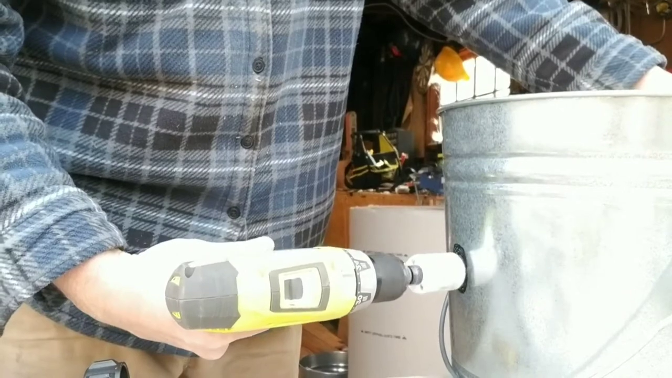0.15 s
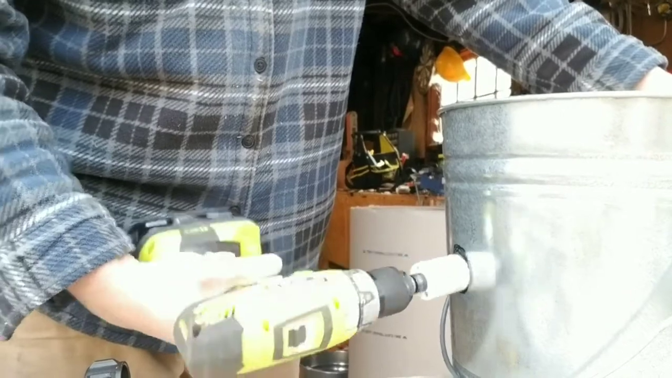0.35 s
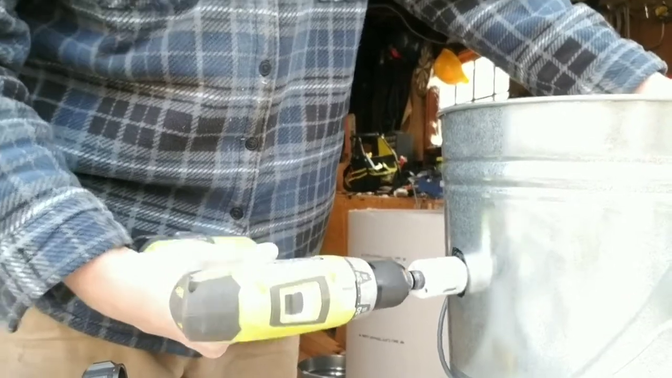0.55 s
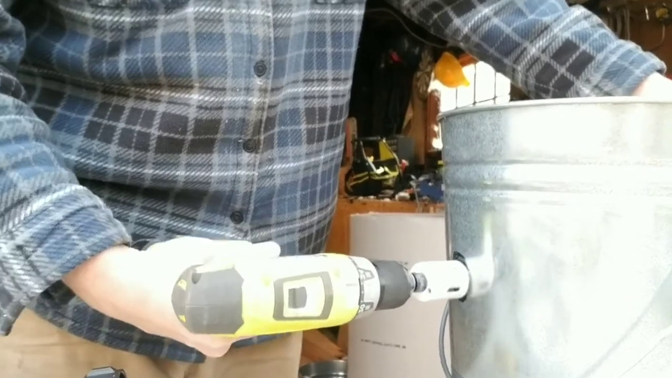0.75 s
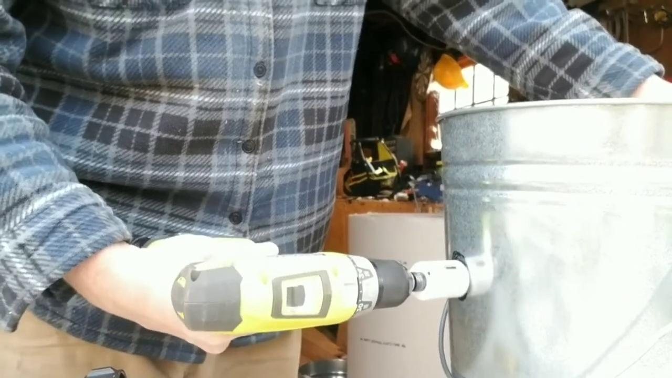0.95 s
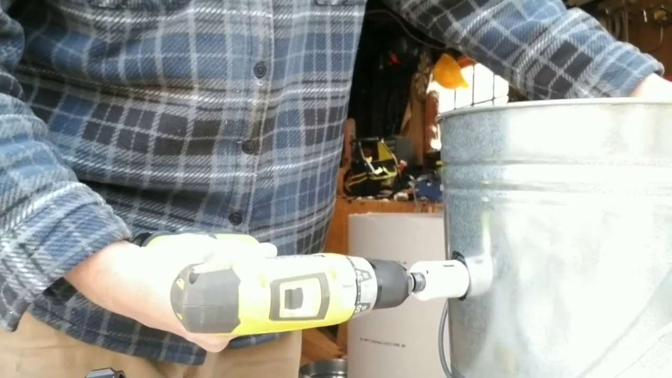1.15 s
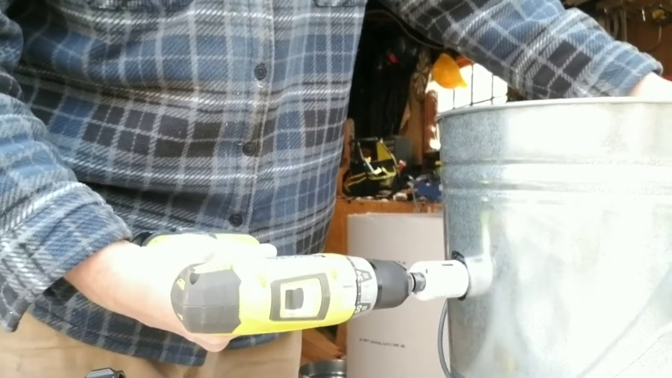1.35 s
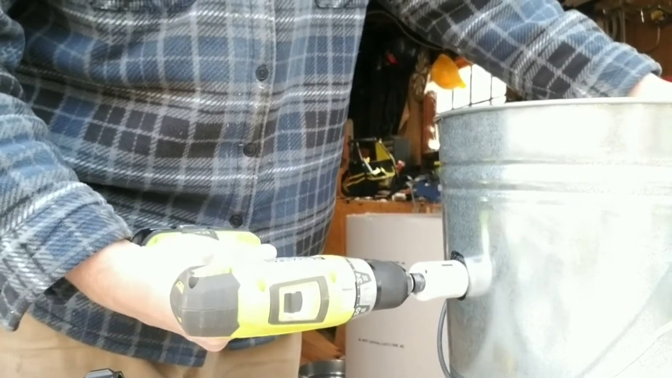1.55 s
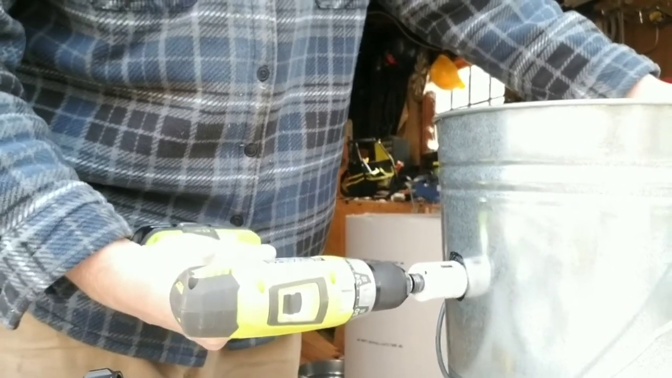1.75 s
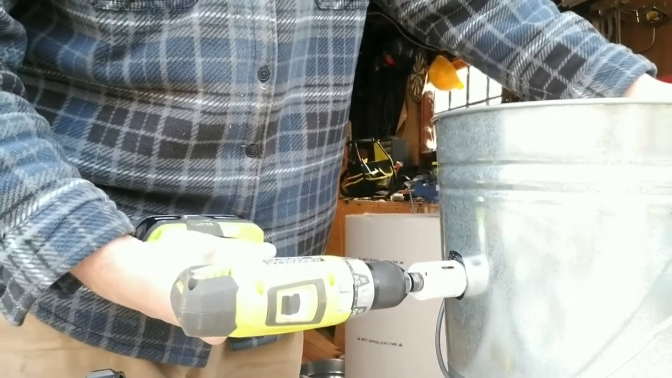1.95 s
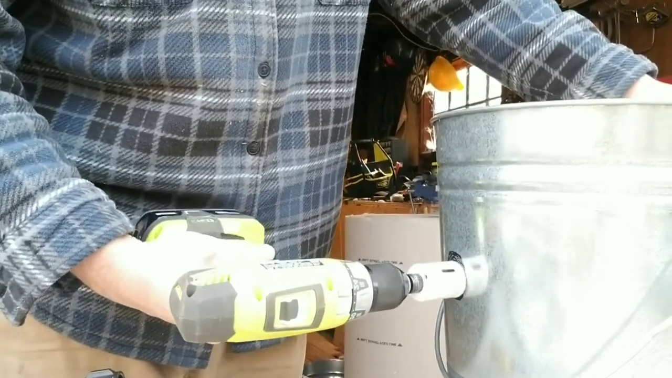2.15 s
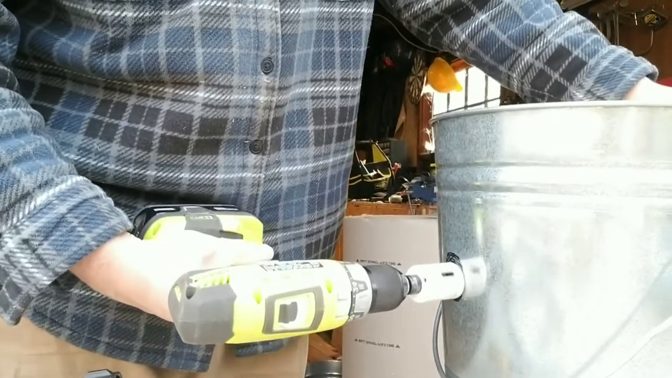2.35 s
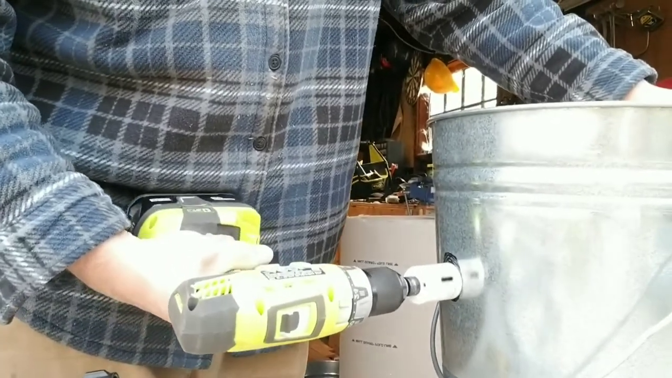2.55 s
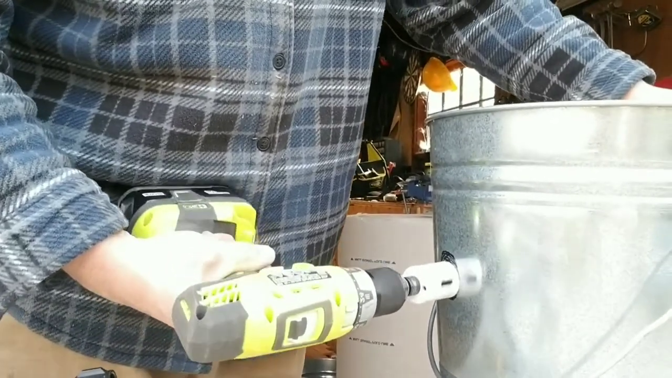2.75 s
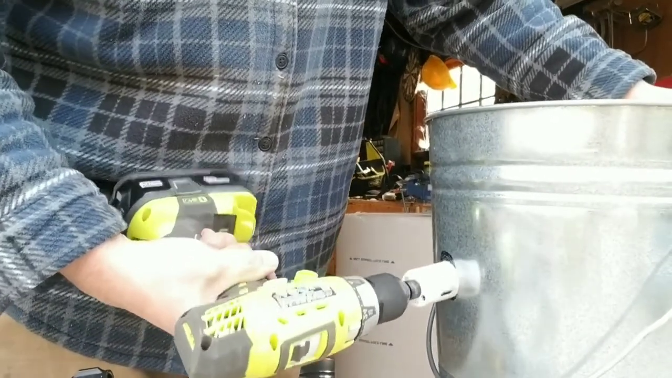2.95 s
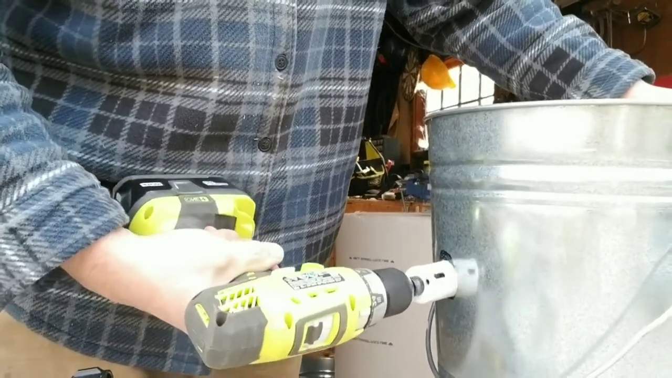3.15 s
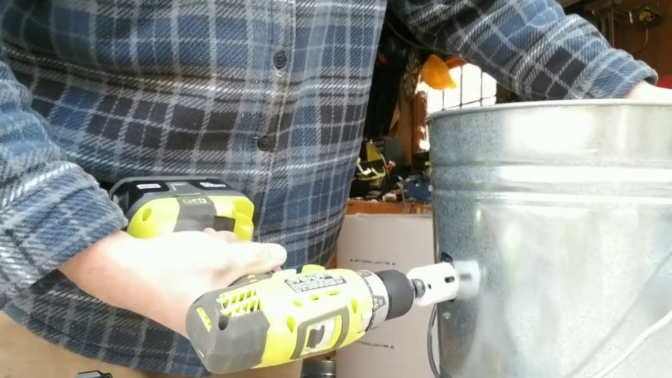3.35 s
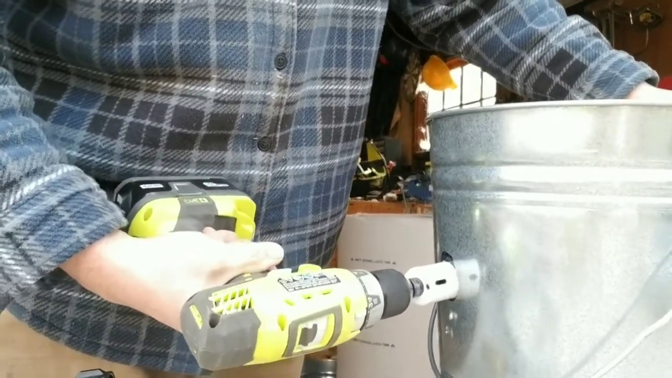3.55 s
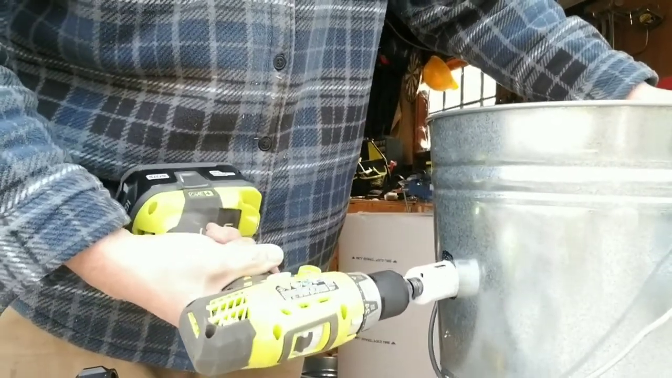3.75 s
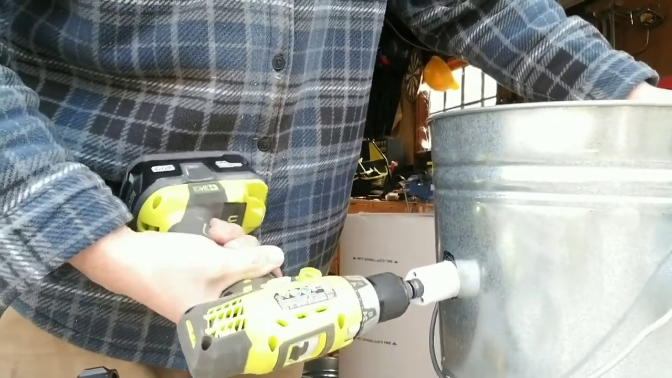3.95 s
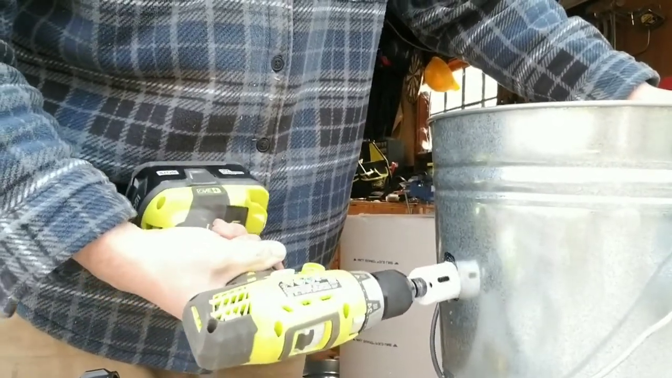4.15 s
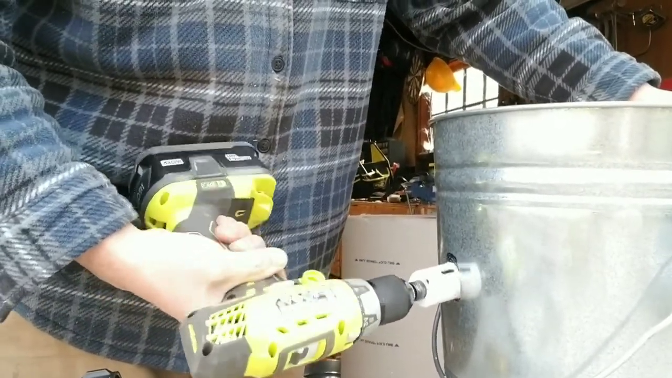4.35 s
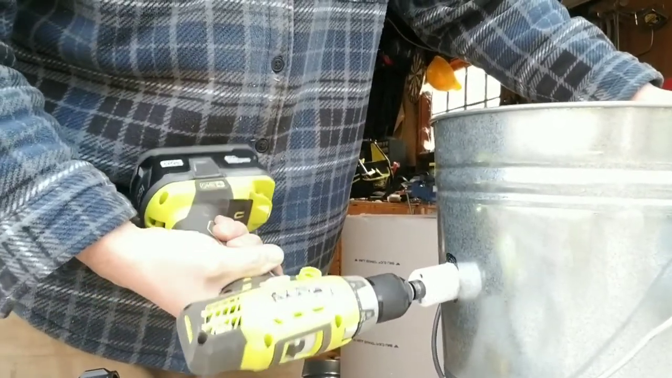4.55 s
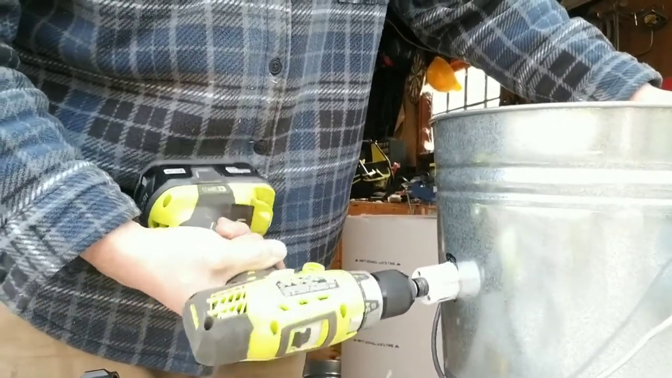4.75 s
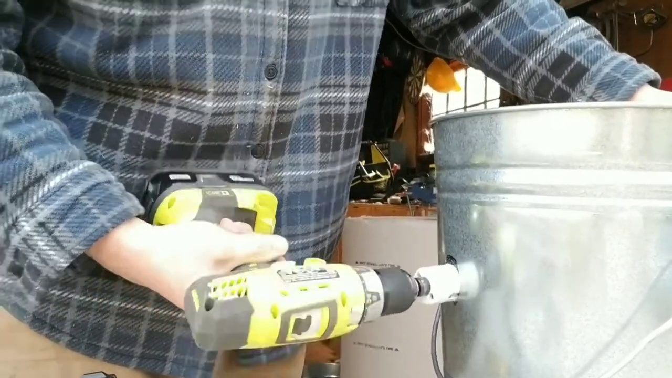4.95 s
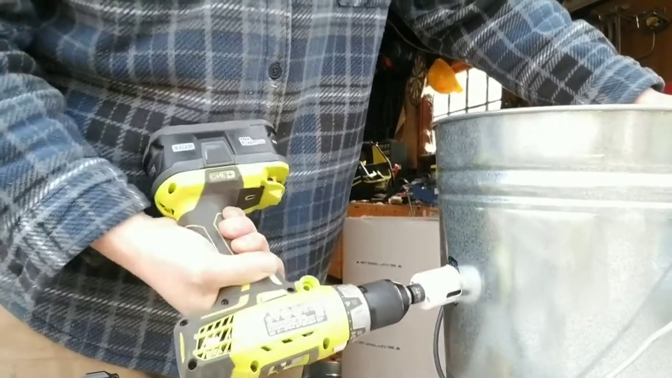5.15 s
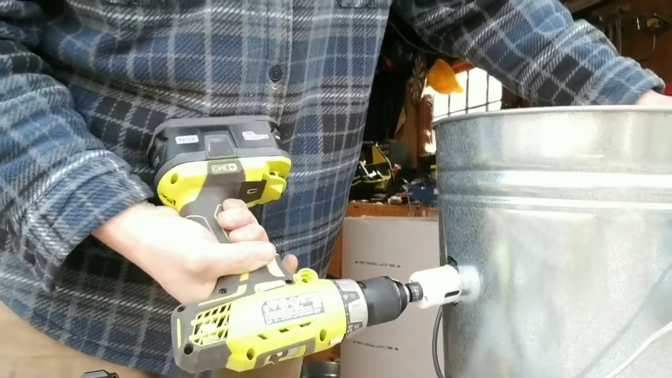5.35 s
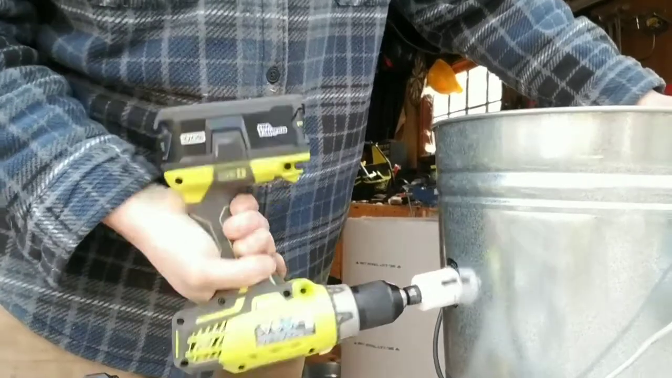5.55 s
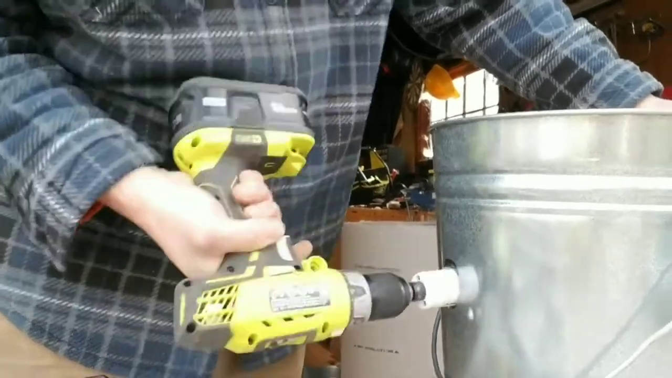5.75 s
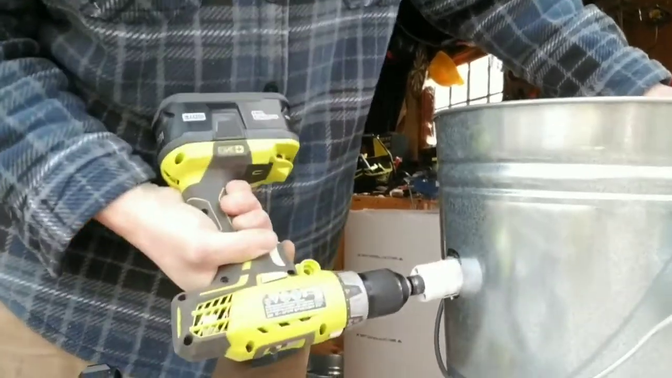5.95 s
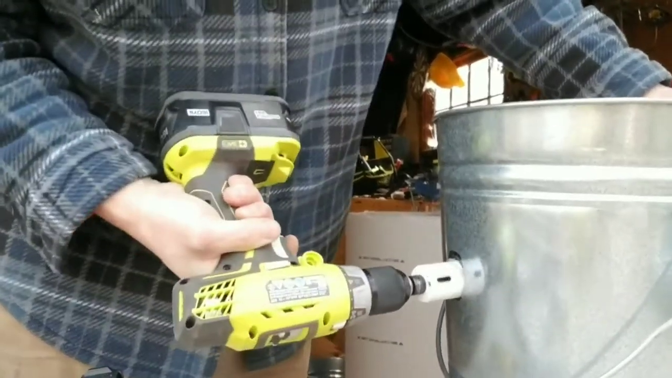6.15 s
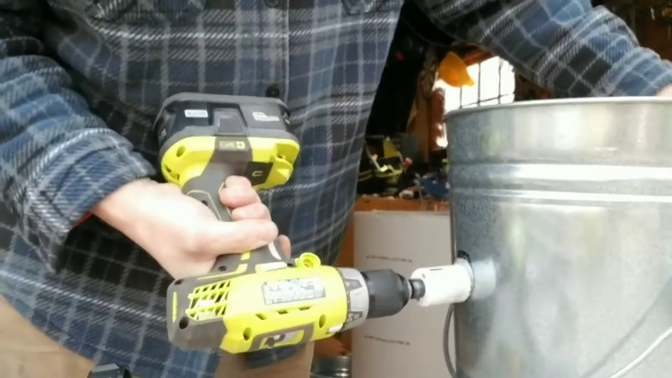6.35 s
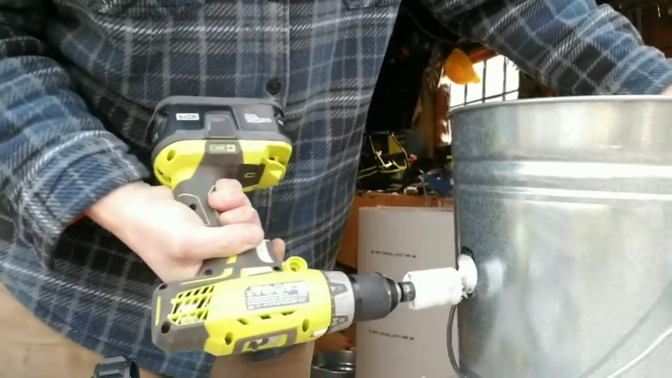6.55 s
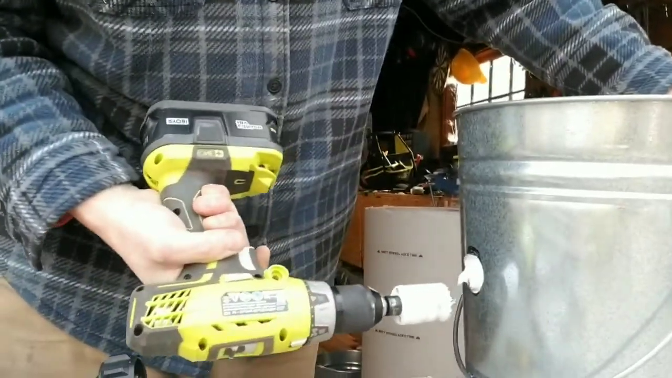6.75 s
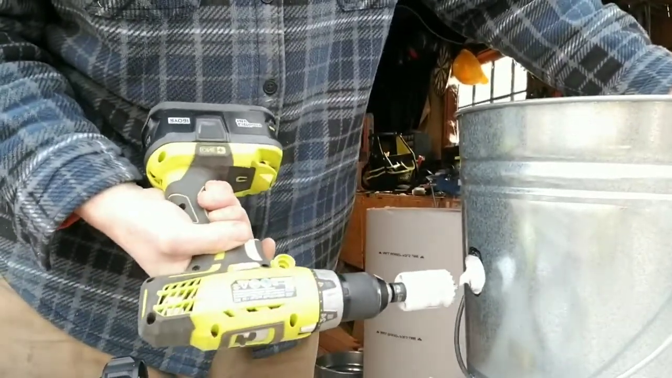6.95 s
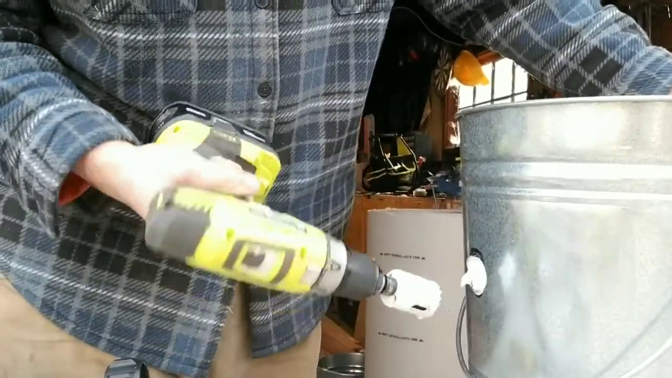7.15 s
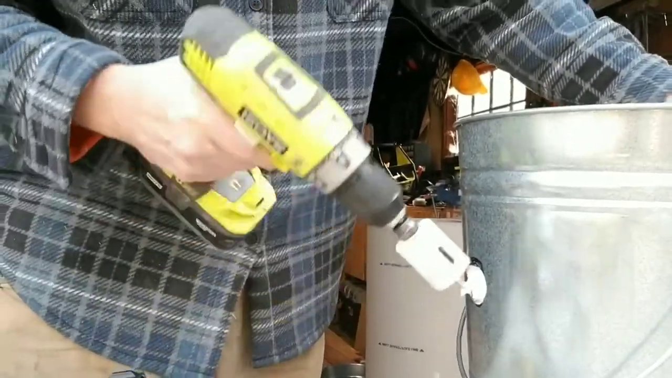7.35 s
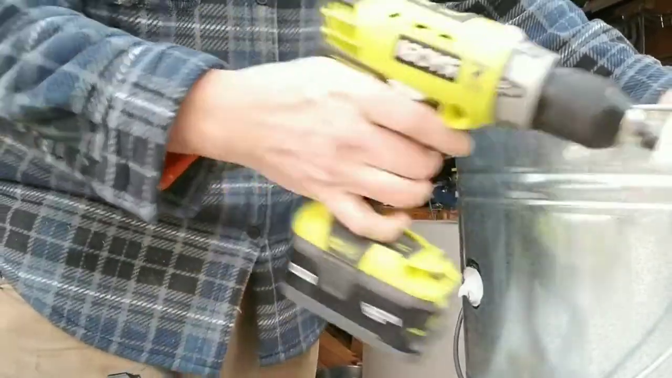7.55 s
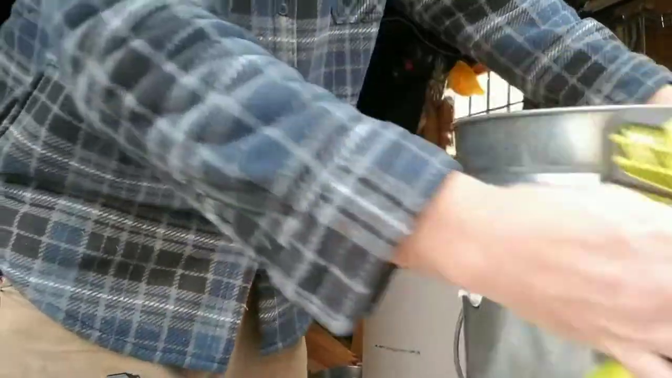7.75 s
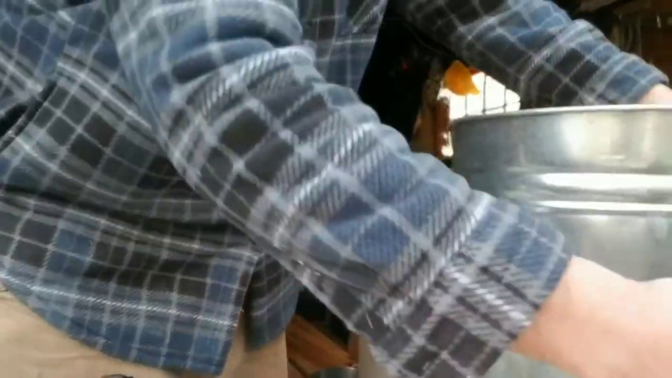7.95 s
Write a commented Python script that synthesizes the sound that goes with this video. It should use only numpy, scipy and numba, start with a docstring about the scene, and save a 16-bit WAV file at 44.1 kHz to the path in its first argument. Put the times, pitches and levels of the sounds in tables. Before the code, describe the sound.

From 0 s a slow hole saw is already grinding on a thin steel tub: a close, dry, gritty rasp with sizzling swarf, ticking chips, short squeals and a low wavering drone. Small snags jolt it around 0.25 and 0.4 s, then it scrapes fairly steadily. From about 2.7 s the teeth catch harder, with hollow booms, clangs and cracks; after a slightly thinner stretch around 3.4 s the banging becomes dense and violent from 3.9 to 4.9 s. It stops sharply at 5 s, with faint cloth rustle. A short, rough burst comes at 5.5-5.7 s, a knock at 5.9 s, then a weaker grind at 6.0-6.2 s, with a faint motor whine and rub coasting down to 6.5 s. Quiet low workshop rumble remains, with a light knock at 6.7 s and sleeve movement. A heavy dull thud lands near 7.85 s, followed immediately by a smaller bump.

```python
"""A cordless drill turns a hole saw slowly through the wall of a thin steel tub in a workshop.
One force on the teeth scrapes out the rasp and shakes the wall into chatter and drone; chips tick.
Gliding tones squeal from wall and cup, and the motor whines faintly as it coasts. As the cut opens, the teeth
snag and bang: each jolt is a burst of boom, clang and crack. Two short bursts finish the hole and a last grind
follows; cloth rustles as filtered noise, the drill is put down with a thud of ringing modes, and the shop rumbles."""
import sys
import numpy as np
from scipy import signal
from scipy.fft import rfft, irfft, next_fast_len
from scipy.io import wavfile
from scipy.ndimage import uniform_filter1d
from numba import njit

SR = 44100
rng = np.random.default_rng(int(sys.argv[2]) if len(sys.argv) > 2 else 0)


def int16_out(signal):
    """Quantize to a 16-bit WAV file."""
    q = np.round(np.clip(np.atleast_2d(signal).T, -1, 1) * 32767)
    wavfile.write(sys.argv[1], SR, q.astype(np.int16))


N = 353241
TIME = np.arange(N) / SR  # seconds

# Teeth that snag hard on the cut edge. Each row: time in seconds, then relative levels of
# boom, clang and crack in dB, and clang pitch in Hz.
SNAGS = [(.243, -24.5, -25.5, -34, 520), (0.25, -29, -22.5, -33.5, 520), (.394, -21, -28, -44, 430),
         (.403, -21, -27, -44, 430), (.428, -21, -26, -40, 430), (.438, -21, -26, -38, 432),
         (2.701, -12, -20, -40.5, 480), (2.789, -12.5, -18, -25, 520), (2.794, -26.5, -20, -33, 600),
         (2.817, -33.5, -31, -40, 745), (2.869, -29.5, -18, -36, 810), (2.898, -25, -15.5, -21.5, 450),
         (2.910, -17, -17, -27, 696), (2.927, -21, -13.5, -33, 620), (2.991, -15, -13.5, -32, 586),
         (3.010, -15.5, -14, -23, 500), (3.037, -18, -12, -24, 700), (3.045, -21.5, -24, -30, 696),
         (3.087, -34, -16.5, -40, 720), (3.128, -17, -19, -22.5, 746), (3.147, -17.5, -15.5, -25, 520),
         (3.176, -31, -20, -28, 700), (3.296, -23, -28, -39, 605), (3.605, -17, -26, -30, 500),
         (3.626, -21, -20, -37, 720), (3.739, -16, -22, -46, 650), (3.771, -28, -25, -44, 680),
         (3.784, -23, -25, -39, 951), (3.799, -16, -17, -31, 786), (3.852, -23, -18, -40, 720),
         (3.869, -29, -24.5, -39, 1100), (3.886, -14.5, -23, -42, 600), (3.925, -14.5, -22, -30.5, 520),
         (3.955, -11, -22, -22, 446), (3.981, -12, -22, -31, 520), (4.0268, -21, -13.5, -30, 690),
         (4.070, -19, -19.5, -41, 720), (4.102, -12.5, -29, -30, 420), (4.109, -11.5, -20, -26.5, 746),
         (4.124, -18, -27, -25, 1196), (4.163, -14, -22, -49, 600), (4.220, -20, -20, -28, 560),
         (4.240, -17, -12.5, -28, 453), (4.259, -16.5, -13, -25, 619), (4.267, -26, -20, -22, 599),
         (4.2772, -14.5, -15, -21.5, 682), (4.2992, -20, -11, -29, 840), (4.317, -16, -17, -25, 750),
         (4.338, -26, -17.5, -27, 650), (4.353, -18, -13.5, -34, 715), (4.376, -16, -17, -29, 479.5),
         (4.389, -12, -25, -26, 450), (4.397, -14, -21, -30, 510), (4.403, -14, -24, -31, 480),
         (4.418, -10, -17, -30, 480), (4.448, -27, -25, -40, 1140), (4.465, -12, -12, -40, 668),
         (4.486, -17.5, -25, -42, 601), (4.502, -22.5, -20.5, -36, 900), (4.516, -16.5, -18.5, -33.5, 650),
         (4.541, -29, -22, -34, 800), (4.556, -17.5, -19, -25, 555), (4.566, -11, -20, -22, 480.4),
         (4.594, -17.5, -19.5, -30, 600), (4.617, -15, -23, -42, 523), (4.634, -15, -20, -42, 480),
         (4.657, -13, -15, -38, 690), (4.675, -16, -24, -44, 450), (4.714, -19, -24, -32, 700),
         (4.731, -14, -20, -25.5, 650), (4.772, -14, -20, -34, 590), (4.791, -12, -28, -41, 521),
         (4.820, -12.5, -17.5, -30, 450), (4.841, -18, -24, -33, 800), (4.897, -29, -23, -30, 1300),
         (4.907, -20, -19, -36, 460), (4.9756, -18.5, -25, -40, 695), (5.502, -19, -18.5, -39, 650),
         (5.5135, -27, -21, -28, 1150), (5.5166, -19.5, -17, -18, 848), (5.573, -26, -30, -46, 623),
         (5.636, -19, -24, -33, 481), (5.6946, -20.5, -22, -47, 544), (6.172, -34, -34, -41, 650),
         (6.191, -34, -36, -50, 520), (6.213, -37, -37, -47, 596), (6.223, -33, -31, -42, 516),
         (6.2368, -24, -29, -50, 513)]
# Pulls of the trigger. Each row: up to speed in seconds, released in seconds,
# coasting rub starts to fade in seconds, relative shaking of the wall in dB.
PULLS = [(-.1, 4.988, 5.09, -0.5), (5.482, 5.678, 5.5, -6.5), (6, 6.137, 6.43, -3.5)]
BRAKE_DB_PER_S = 526  # how fast the cutting sound falls at release


def amp(db):
    """Decibels to gain."""
    return 10 ** (np.asarray(db) / 20)


def unit(x):
    """Scale to rms 1."""
    return x / np.sqrt(np.mean(x ** 2))


def walk(rate):
    """Smooth random wander of rms 1, with about rate new values a second."""
    hold = int(SR / rate)
    steps = np.repeat(rng.standard_normal(N // hold + 1), hold)
    return unit(uniform_filter1d(steps, hold)[:N])


def swells(rows):
    """Gain of smooth movements that rise and fall; rows of middle s, half length s, dB."""
    gain = np.zeros(N)
    for s, half, db in rows:
        near = slice(*np.searchsorted(TIME, [s - 4 * half, s + 4 * half]))
        gain[near] += amp(db) * np.exp(-((TIME[near] - s) / half) ** 2)
    return gain


def colour(x, points):
    """Causal minimum-phase filter with a spectrum of (Hz, dB) points."""
    size = next_fast_len(x.shape[-1] + 4096, True) // 2 * 2
    hz, db = np.transpose(points)
    octave = np.log2(np.maximum(np.fft.rfftfreq(size, 1 / SR), 1))
    outside = np.abs(octave - np.clip(octave, np.log2(hz[0]), np.log2(hz[-1])))
    # beyond the end points the level falls 20 dB an octave, by 40 dB at most
    level_db = np.interp(octave, np.log2(hz), db) - 20 * np.minimum(outside, 2)
    cepstrum = irfft(np.log(amp(level_db)))
    cepstrum[1:size // 2] *= 2
    cepstrum[size // 2 + 1:] = 0
    return irfft(rfft(x, size) * np.exp(rfft(cepstrum)))[..., :x.shape[-1]]


def resonate(x, hz, width):
    """One resonance, gain 1 at its centre."""
    return signal.lfilter(*signal.iirpeak(hz, hz / width, fs=SR), x)


@njit
def moving_resonance(x, hz, width):
    """A resonance whose centre moves, gain 1 at the centre."""
    y, band, low = np.empty(len(x)), 0., 0.
    for i in range(len(x)):
        g, k = np.tan(np.pi * hz[i] / SR), width / hz[i]
        v = (band + g * (x[i] - low)) / (1 + g * (g + k))
        band, low, y[i] = 2 * v - band, low + 2 * g * v, k * v
    return y


def shifting_modes(x, modes, wander_db, rate, bend=0):
    """Resonances whose shares and pitches shift as the point of contact travels round the cut."""
    out = 0
    for hz, width, db in modes:
        centre = hz * np.exp(bend * walk(rate))
        share = amp(db + wander_db * walk(rate))
        out = out + share * np.array([moving_resonance(port, centre, float(width)) for port in x])
    return out


def even_out(x, window_s):
    """Steady pressure on the drill holds a vibration at its mean strength."""
    power = uniform_filter1d(np.mean(x ** 2, axis=0), int(window_s * SR))
    return x / np.sqrt(power + 1e-12)


def ports(x, lag):
    """The two microphone ports; the right one hears lag samples later (the left one, if lag is negative)."""
    late = int(np.round(lag))
    return np.array([np.pad(x, (max(d, 0), 0))[:len(x)] for d in (-late, late)])


def scrape(force, spread_db):
    """Dense tiny slips of unequal size, as strong as the force on the teeth."""
    sizes = amp(spread_db * np.minimum(rng.exponential(size=N), 5))
    return unit(rng.standard_normal(N) * sizes * force)


def spread(force, spread_db, diffuse, lag):
    """Scraping heard directly and, unrelated at each port, off the tub and the shop."""
    direct = ports(scrape(force, spread_db), lag)
    return direct + diffuse * np.array([scrape(force, spread_db), scrape(force, spread_db)])


def burst(points, decay_s, tail_db, tail_s, diffuse, lag, snap=0, ring_hz=0):
    """A release (a clean snap plus crumbling) and a short rattle, coloured by the part that it shakes."""
    t = TIME[:SR // 8]
    noise = rng.standard_normal((3, len(t)))
    crumbling = unit(noise[0] * np.exp(-t / decay_s))
    direct = unit(crumbling - snap * unit(1. * (t == 0)))
    rattle = amp(tail_db) * unit(noise[1:] * np.exp(-t / tail_s))
    y = colour(ports(direct + rattle.mean(0), lag) + diffuse * rattle, points)
    if ring_hz:
        y = y + amp(13) * resonate(y, ring_hz, width=90)
    return y / np.sqrt(np.mean(y[:, :SR // 50] ** 2))  # rms 1 over the first 20 ms


def add(out, s, sound):
    """Mix a sound in at a time."""
    i = int(s * SR)
    out[:, i:i + sound.shape[-1]] += sound[..., :N - i]


def feed():
    """Pressure on the saw as a gain, and the bite of its teeth."""
    # How the saw is fed into the steel. Each row: time in seconds, pressure in dB, bite from 0 to 1.
    feed_rows = [(0, -30, 0), (.29, -28.5, 0), (.35, -31, 0.02), (.41, -29, 0.1), (.48, -29.5, 0.04),
                 (.55, -29, 0.09), (1.15, -28.5, 0.1), (1.4, -27.3, 0.18), (1.8, -26.7, 0.25),
                 (2.2, -28.5, 0), (2.65, -27.5, 0.06), (2.98, -25.5, 0.78), (3.08, -30.5, 0.9),
                 (3.23, -32, 0.77), (3.35, -39.5, 0.8), (3.6, -32.5, 0.78), (3.9, -30.5, 0.9),
                 (4.19, -30.5, 0.99), (4.28, -27.5, 0.79), (4.48, -30.5, 0.9), (4.73, -28.5, 0.89),
                 (4.805, -31, 0.72), (4.91, -30.5, 0.64), (4.96, -32, 0.5), (5.5, -30.5, 0.4),
                 (5.68, -33, 0.54), (5.98, -40, 0), (6.06, -36.5, 0), (6.14, -36.5, 0), (6.3, -31, 0.5)]
    s, db, bite = np.transpose(feed_rows)
    return amp(np.interp(TIME, s, db)), np.clip(np.interp(TIME, s, bite), 0, 1)


def pull(start, release, stop, brake_db_per_s):
    """One pull of the trigger: spin up, hold, brake, and a faint coasting rub."""
    spin_up_db_per_s, coast_db, coast_db_per_s = 503, -24, 169.5
    rise_db = -spin_up_db_per_s * np.maximum(start - TIME, 0)
    brake_db = -brake_db_per_s * np.maximum(TIME - release, 0)
    rub_db = coast_db - coast_db_per_s * np.maximum(TIME - stop, 0)
    return amp(rise_db + np.maximum(brake_db, rub_db))


def turning(brake_db_per_s):
    """Gain of all the pulls together."""
    return sum(pull(start, release, stop, brake_db_per_s) for start, release, stop, _ in PULLS)


def tooth_force(uneven, decay=0.71, scatter_db=5, depth=0.97, turn_db=0.5):
    """Each tooth loads and lets go with its own strength; the load swells once a turn."""
    tooth_hz, turn_hz = 104.64, 5.7  # both wander about these
    phase = np.cumsum(tooth_hz * np.exp(.2 * walk(60))) / SR
    strength = amp(scatter_db * rng.standard_normal(N)[phase.astype(int)])
    bites = unit(strength * np.exp(-(phase % 1) / decay))
    share = np.clip(depth * uneven, 0, .95)  # part of the force that comes tooth by tooth
    turn = np.sin(2 * np.pi * np.cumsum(turn_hz * (1 + 0.091 * walk(1.7))) / SR)
    force = (1 - share + share * bites) * amp(turn_db * turn)
    return force / np.sqrt(uniform_filter1d(force ** 2, SR // 8))


def relief():
    """A hard snag takes the load off the other teeth, so the steady grinding dips."""
    after_s, half_s, dip_db = .008, 0.0097, -1.5
    dips = swells([(row[0] + after_s, half_s, 0) for row in SNAGS])
    return amp(dip_db * np.minimum(dips, 1))


def by_bite(skating_db, added_db, bite):
    """Gain of a layer from its level when skating and the dB added at full bite."""
    return amp(skating_db + added_db * bite)


def sheet_ring(x, ring_db=-6, ring_s=.012):
    """The steel sheet's many close modes add a short, dense ringing to whatever scrapes it."""
    t = TIME[:SR // 16]
    response = rng.standard_normal(len(t)) * np.exp(-t / ring_s)
    response = response / np.sqrt(np.sum(response ** 2))
    return x + amp(ring_db) * signal.fftconvolve(x, response[None], axes=1)[:, :N]


def teeth(force, uneven, bite, cut_gain, grab, eased):
    """Rasp ringing in the cup, hiss of swarf, and clatter that takes over as the bite deepens."""
    # The saw cup's own ringing. Each row: centre in Hz, width in Hz, relative level in dB.
    cup_modes = [(1100, 40, -6.5), (1370, 56, -6), (1528, 80, 0.5), (2103, 150, 0), (2323, 69, -4),
                 (2562, 130, -3.5), (3120, 42, -4), (3790, 219, -6), (5070, 260, -7)]
    # Spectra of teeth, swarf and clatter. Each row: frequency in Hz, relative level in dB.
    rasp_points = [(500, -22), (900, -11), (1200, -4), (1520, -2.5), (1800, -4), (2130, -1.5), (2560, 0),
                   (3100, -4.5), (3850, -3), (4500, -4.5), (5200, -6.5), (6000, -13), (7000, -10),
                   (10000, -39.5)]
    swarf_points = [(3500, -22.5), (5600, -1), (6500, -1), (7000, -3), (7900, 1.5), (9000, -2.5),
                    (10800, -0.5), (12400, 0), (14000, -1), (15800, -1.5)]
    clatter_points = [(250, -22), (480, -3.5), (700, 3.5), (950, -0.5), (1400, -3.5), (1900, -6),
                      (3000, -23), (6000, -18), (12000, -32)]
    slips = spread(force ** 0.5, spread_db=2.0, diffuse=1.34, lag=4)
    cup = shifting_modes(slips, cup_modes, wander_db=3.5, rate=21, bend=.007)
    rasp = unit(colour(sheet_ring(slips) + amp(-3.0) * cup, rasp_points))
    swarf = unit(colour(spread(force ** 0.5, spread_db=-1.5, diffuse=4.2, lag=4), swarf_points))
    clatter = unit(colour(spread(force ** 1.05, spread_db=3, diffuse=.45, lag=-6), clatter_points))

    cutting = eased ** 0.23 * amp(4 - 5.3 * uneven) * rasp
    cutting = cutting + eased * by_bite(-11.5, 12, bite) * clatter
    cutting = cutting + by_bite(0.18, -4.5, bite) * swarf
    grinding = amp(0.5) * rasp + amp(-0.5) * clatter
    return cut_gain * cutting + (np.hypot(cut_gain, grab) - cut_gain) * grinding


def chatter(force, pressure, bite, grab):
    """The teeth shake the wall's modes, harder with pressure and bite and when the cup grabs."""
    # The tub wall, loaded by the saw. Each row: centre in Hz, width in Hz, relative level in dB.
    wall_modes = [(155.6, 38, -3.5), (240.3, 19, 0), (297.6, 29, 2.5), (330, 33, 1), (412, 77, 3.5),
                  (519.6, 30, 0), (650, 72, -12)]
    shake = spread(force, spread_db=2.5, diffuse=0.32, lag=-1)
    wall = shifting_modes(shake, wall_modes, wander_db=2.0, rate=16, bend=.04)
    wall = even_out(colour(wall, [(70, -18.0), (190, 2.5), (600, -3.5), (1000, -13.5)]), window_s=.08)
    shaking = sum(amp(db) * pull(start, release, stop, BRAKE_DB_PER_S) for start, release, stop, db in PULLS)
    # the wall chatters less until the teeth seat in the groove
    seated = amp(np.interp(TIME, (0.16, 0.24), [-7, 0]))
    gain = np.hypot(pressure * shaking * seated * by_bite(3.5, 4.5, bite), amp(7.5) * grab)
    # it surges as the teeth take and lose hold, and the off-centre cup leans on it by turns
    surge_db = 0.85 * walk(14)
    wobble_db = 0.5 * np.sin(2 * np.pi * 8.2 * TIME)
    return gain * amp(surge_db + wobble_db) * wall


def drone(force):
    """The wall's lowest flexing, which rings on after each pull."""
    # Lowest flexing of the tub wall. Each row: centre in Hz, width in Hz, relative level in dB.
    panel_modes = [(95, 6.9, -0.5), (74, 29, -19.5)]
    # The low drone while the saw turns. Each row: time in seconds, relative level in dB.
    drone_rows = [(0, -20), (.3, -30), (.5, -26.5), (.85, -33), (1.07, -22), (1.45, -32), (1.8, -27.5),
                  (2.1, -32), (2.27, -40), (2.55, -30), (2.8, -31.5), (3.2, -29.5), (3.6, -34.5),
                  (4.13, -24), (4.25, -28), (4.62, -24.5), (4.8, -34), (4.97, -24), (5.48, -38),
                  (5.57, -27.5), (5.68, -30), (6.1, -40)]
    shake = spread(force, spread_db=2, diffuse=0.18, lag=0)
    flex = shifting_modes(shake, panel_modes, wander_db=-1.0, rate=3.3)
    flex_points = [(25, -8.0), (60, -12.0), (88, 0.0), (115, -1), (200, -10.5)]
    flex = even_out(colour(flex, flex_points), window_s=0.0994)
    driven = amp(np.interp(TIME, *np.transpose(drone_rows))) * turning(brake_db_per_s=110.5)
    # the hands alone keep a little going; the wall comes to rest after the saw has left it
    hands_fade_s = 0.49
    held = amp(-44.5) * np.clip(1 - (TIME - PULLS[-1][2]) / hands_fade_s, 0, 1)
    return np.hypot(driven, held) * flex


def saw():
    """One force on the teeth drives the rasp, the wall's chatter and its drone."""
    # The cup grabs and grinds for a moment, last as it leaves the hole.
    # Each row: middle in seconds, half length in seconds, relative level in dB.
    grab_rows = [(.265, 0.028, -27.5), (.435, 0.025, -35.5), (1.9, 0.061, -33), (2.97, 0.096, -45),
                 (3.86, 0.087, -33.5), (4.27, .04, -36), (4.405, 0.038, -31), (4.56, 0.032, -31.5),
                 (4.91, 0.018, -25), (5.524, 0.012, -30), (5.648, 0.027, -33), (5.705, .014, -48),
                 (6.225, 0.045, -43)]
    pressure, bite = feed()
    uneven_skating, uneven_biting = 0.25, 0.59
    uneven = uneven_skating + (uneven_biting - uneven_skating) * bite
    force, grab, eased = tooth_force(uneven), swells(grab_rows), relief()
    force = force * amp(1.5 * (1 - bite) * walk(70))  # the skating cup grips and slips
    cut_gain = pressure * turning(BRAKE_DB_PER_S)
    cutting = teeth(force, uneven, bite, cut_gain, grab, eased)
    return cutting + eased * chatter(force, pressure, bite, grab) + drone(force)


def chips(rate=170, spread_db=3, db=-9):
    """Steel chips break off one by one, at a mean rate per second, and tick above the rasp."""
    breaks = rng.random(N) < rate / SR
    sizes = amp(spread_db * np.minimum(rng.exponential(size=N), 3))
    snap = np.exp(-TIME[:SR // 100] / 0.0021)
    force = signal.lfilter(snap, 1, breaks * sizes)
    tick_points = [(500, -10.0), (1400, 6.0), (1800, -3.0), (2400, -1.5), (3500, -9.0), (6000, -10.5),
                   (15000, -8)]
    ticks = colour(spread(force, spread_db=2.0, diffuse=0.58, lag=-6), tick_points)
    return unit(ticks) * feed()[0] * turning(BRAKE_DB_PER_S) * amp(db)


def gliding_tones():
    """Most are rubbing tones of wall or cup; the last is the motor's whine sinking; all waver as they glide."""
    # Low rubbing tones are of the wall, high ones of the saw cup; the faint one from 6.22 s is
    # the motor's whine as it coasts. Each row: start in seconds, end in seconds,
    # first pitch in Hz, last pitch in Hz, level in dB before the flutter.
    tone_rows = [(-.1, 0.243, 4200, 4140, -37), (-.1, .22, 6600, 6700, -44),
                 (-.1, 0.236, 306, 304.5, -30.5), (0.275, 0.343, 290, 294, -20.5),
                 (0.502, 0.575, 298, 295, -17.5), (1.403, 1.5, 221, 224, -25),
                 (1.61, 1.696, 260.4, 218, -23), (1.86, 1.96, 1494, 1467, -30),
                 (1.899, 2.014, 500, 385, -23), (2.703, 2.739, 238, 237, -14.5),
                 (2.835, 2.9, 236, 230, -14.5), (2.93, 2.983, 555, 595, -20.5),
                 (3.944, 4.018, 11080, 10900, -35), (4.102, 4.26, 11210, 11230, -41),
                 (4.6, 4.68, 248, 228, -20.5), (4.67, 4.712, 440, 420, -19),
                 (4.706, 4.756, 269.3, 281.5, -19), (4.815, 4.877, 257.4, 240, -10.5),
                 (4.83, 4.885, 183, 149, -14.5), (4.877, 4.905, 238, 306, -12.5),
                 (4.894, 4.93, 114.9, 104, -13), (4.9, 4.933, 438, 477, -21), (4.905, 4.963, 300, 203, -22),
                 (4.972, 5.035, 290, 169, -25.5), (4.97, 5.07, 11150, 11150, -63),
                 (5.049, 5.071, 245, 235, -34), (5.121, 5.187, 7813, 7740, -60),
                 (5.496, 5.534, 278, 187, -12.5), (5.619, 5.648, 440, 340, -23),
                 (5.639, 5.677, 595, 520, -21), (5.651, 5.678, 320, 201, -25),
                 (5.695, 5.725, 330, 240, -26), (5.7, 5.801, 11340, 11200, -64),
                 (5.876, 5.918, 297, 201, -36), (6.22, 6.51, 2640, 2550, -61)]
    out = np.zeros((2, N))
    wavers, flutter = walk(120), amp(2 * walk(60))
    for start, end, first_hz, last_hz, db in tone_rows:
        on = (TIME > start) & (TIME < end)
        along = (TIME[on] - start) / (end - start)
        hz = first_hz + (last_hz - first_hz) * along
        wavering_hz = hz + (10 + .003 * hz) * wavers[on]
        tone = np.sin(2 * np.pi * np.cumsum(wavering_hz) / SR)
        out[:, on] += ports(np.sin(np.pi * along) * tone * flutter[on] * amp(db), lag=1.4)
    return out


def shop():
    """Low workshop rumble, alike at both ports in the bass."""
    # Spectrum of the rumble. Each row: frequency in Hz, relative level in dB.
    shop_points = [(25, -24), (50, -4), (80, 2.5), (125, -5), (170, -1), (205, -15), (260, -10),
                   (330, -18.5), (500, -22), (750, -20), (1500, -27), (2900, -45.5), (7000, -59),
                   (15500, -52.5)]
    mid, side = rng.standard_normal((2, N))
    side = colour(side, [(25, -4.0), (60, -20), (120, -21.0), (400, -4), (1200, 2.0), (16000, -1.5)])
    air = colour(np.array([mid + side, mid - side]), shop_points)
    return unit(air) * amp(-46.5 + 0.25 * walk(8.3))


def rocking():
    """Deep rumble of the whole tub shifting on its stand when the drill is shoved."""
    # Shoves. Each row: middle in seconds, half length in seconds, level in dB.
    shove_rows = [(.45, 0.38, -33), (3.05, .5, -41), (4.3, 0.51, -34), (4.9, 0.14, -35),
                  (5.6, 0.099, -30.5), (6.17, 0.4, -44), (6.9, 0.66, -55)]
    rumble_points = [(22, -16.0), (40, -16.5), (58, 2.5), (72, -5.0), (100, -23.5)]
    rumble = colour(spread(np.ones(N), spread_db=4.5, diffuse=0.36, lag=0), rumble_points)
    return unit(rumble) * swells(shove_rows)


def light_snags():
    """Chance snags, more frequent as the bite deepens: rows like those of the hard ones."""
    pressure, bite = feed()
    per_s = 30 * bite ** 2 * turning(BRAKE_DB_PER_S)
    at = np.flatnonzero(rng.random(N) < per_s / SR)
    rows = []
    for i, chance in zip(at, rng.standard_normal((len(at), 4))):
        # boom, clang and crack follow the pressure, with a scatter of 0.5 dB
        levels_db = 20 * np.log10(pressure[i]) + np.array((5, 1.5, -8)) + 0.5 * chance[:3]
        clang_hz = 800 * 2 ** (chance[3] / 2)
        rows.append((i / SR, *levels_db, clang_hz))
    return rows


def snags(rows):
    """A caught tooth springs free with one jolt: wall boom, clang pitched by the place of catch, edge crack."""
    # Spectra of the three parts of a jolt. Each row: frequency in Hz, relative level in dB.
    boom_points = [(60, -16.5), (150, -5.5), (240, 2), (310, 0.5), (450, -5), (600, -18), (1100, -31.5)]
    clang_points = [(250, -14), (480, -1.5), (850, 0), (1060, -3), (1250, 0), (1520, 1.5), (1800, -8),
                    (2300, -13), (3500, -23)]
    crack_points = [(1000, -17), (2400, 2.5), (4000, 1), (6000, -8.5), (9000, -18.5), (15000, -10)]
    out = np.zeros((2, N))
    for s, boom_db, clang_db, crack_db, hz in rows:
        boom = burst(boom_points, decay_s=.002, tail_db=-9, tail_s=.009, diffuse=.35, lag=-2, snap=2)
        clang = burst(clang_points, decay_s=.0022, tail_db=-8.5, tail_s=.006, diffuse=.9, lag=-5,
                      snap=1.2, ring_hz=hz)
        crack = burst(crack_points, decay_s=.0024, tail_db=-3, tail_s=.006, diffuse=1.1, lag=-6)
        add(out, s, amp(clang_db - 4.5) * clang + amp(crack_db - 1.5) * crack + amp(boom_db - 6) * boom)
    return out


def sleeve():
    """Cloth fibres brush past each other as the sleeve moves."""
    # Sleeve movements. Each row: middle in seconds, half length in seconds, level in dB before the flutter.
    sleeve_rows = [(5.085, .03, -53), (5.182, 0.015, -54), (5.32, 0.13, -66), (5.79, 0.093, -64.5),
                   (6.55, 0.16, -69), (7.42, 0.14, -66), (7.51, 0.043, -67.5), (7.83, 0.22, -63)]
    force = swells(sleeve_rows) * amp(2.9 * walk(40))
    fibres = spread(np.ones(N), spread_db=4.0, diffuse=1.5, lag=-3.5)
    cloth_points = [(800, -5.5), (1700, 7.0), (3300, -1), (6000, -5.5), (10000, -11.5), (15000, -6)]
    return force * unit(colour(fibres, cloth_points))


def knocks():
    """Dull blows of the handled drill ring low modes and thud; the housing's tick grows faster with the blow."""
    # Knocks as the drill is handled and put down. Each row: time in seconds, peak of the ringing in dB.
    knock_rows = [(5.876, -24), (6.689, -35), (7.694, -43), (7.856, -5), (7.925, -28)]
    # Modes that a knock rings. Each row: frequency in Hz, relative level in dB, 60 dB decay in seconds.
    knock_modes = [(68.7, -10.5, 0.35), (121.5, 10.5, 0.052), (156.3, -10.5, 0.23), (245, -2, 0.11),
                   (300, -11, 0.1), (381, -10, 0.077), (500, -25, 0.059)]
    thud_points = [(60, -8), (150, 0), (280, 0), (480, -5), (700, -28)]
    tick_points = [(500, 12.5), (850, 6), (1750, 0), (2500, -7), (7000, -13.5), (15000, -22)]
    out, t = np.zeros((2, N)), TIME[:SR // 2]
    for s, db in knock_rows:
        ring = 0
        for hz, mode_db, t60 in knock_modes:
            ring = ring + amp(mode_db) * np.sin(2 * np.pi * hz * t) * np.exp(-np.log(1000) * t / t60)
        ring = ring * (1 - np.exp(-(t / 0.0049) ** 2))
        thud = burst(thud_points, decay_s=.012, tail_db=-8, tail_s=.028, diffuse=.4, lag=-9)
        tick = burst(tick_points, decay_s=0.02, tail_db=-2, tail_s=0.038, diffuse=1.0, lag=-5.5)
        # the rubber grip cushions the blow, so the tick swells over a few milliseconds
        tick = tick * (1 - np.exp(-(t[:tick.shape[1]] / 0.004) ** 2))
        add(out, s, -amp(db) * ports(ring / np.abs(ring).max(), lag=-20))
        add(out, s, amp(db - 18.0) * thud)
        add(out, s, amp(1.5 * db - 32.0) * tick)
    return out


def scene():
    """Everything at the tub, over the workshop's rumble."""
    steady = saw() + chips() + gliding_tones() + shop() + rocking()
    return steady + snags(SNAGS + light_snags()) + sleeve() + knocks()


def record(dry):
    """The recorder clips at full scale and cuts the top."""
    top_hz = 15950
    low_pass = signal.ellip(12, .2, 80, top_hz, fs=SR, output="sos")
    return signal.sosfilt(low_pass, np.clip(dry, -1, 1))


dry = scene()
out = record(dry)
int16_out(out)
```